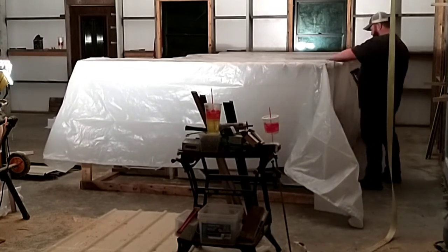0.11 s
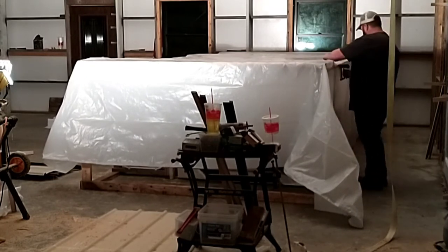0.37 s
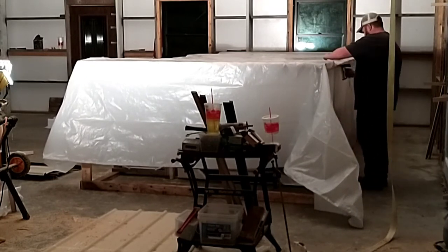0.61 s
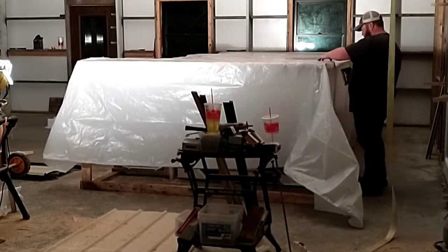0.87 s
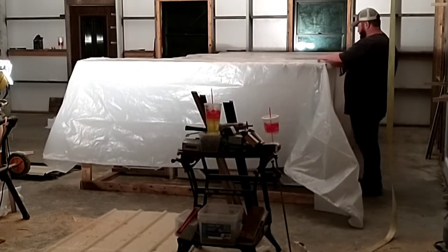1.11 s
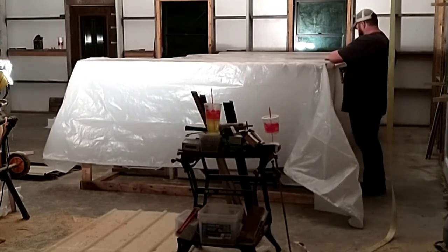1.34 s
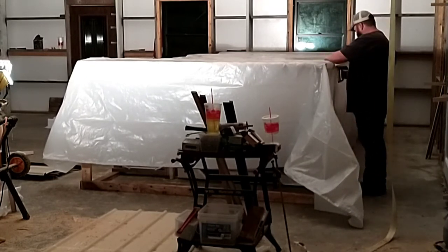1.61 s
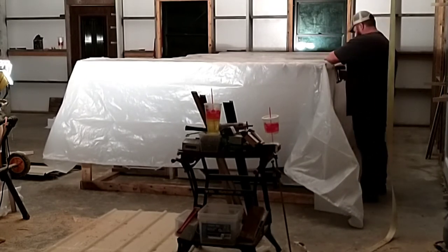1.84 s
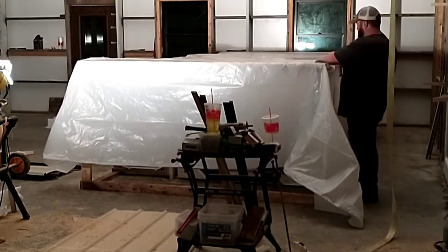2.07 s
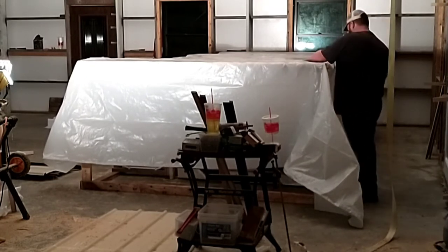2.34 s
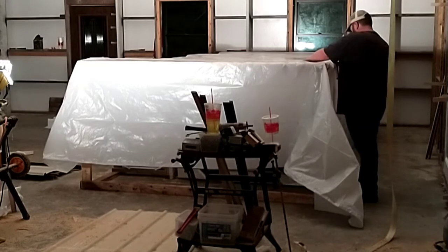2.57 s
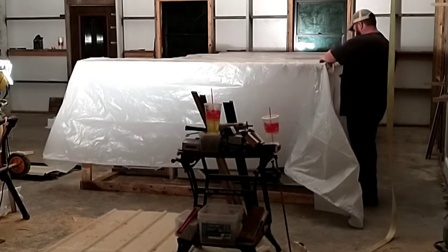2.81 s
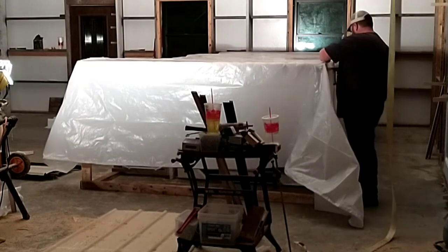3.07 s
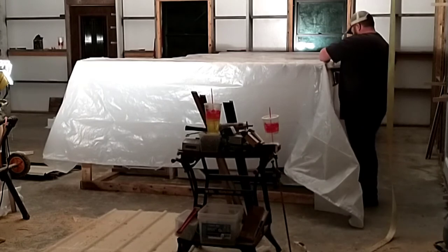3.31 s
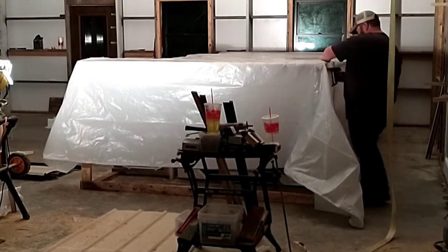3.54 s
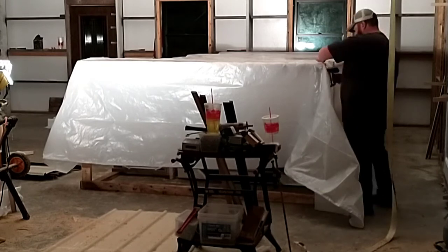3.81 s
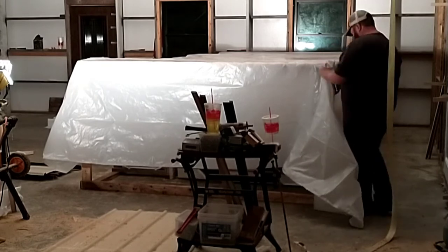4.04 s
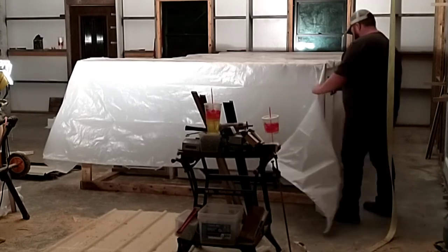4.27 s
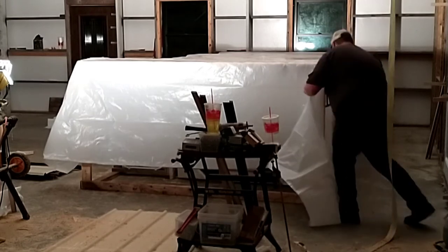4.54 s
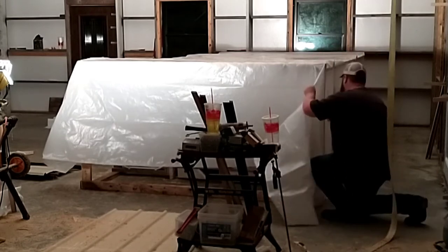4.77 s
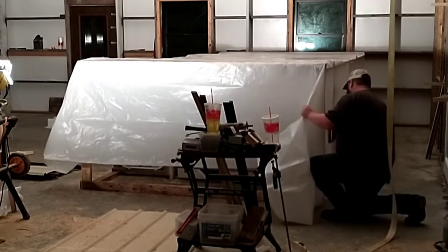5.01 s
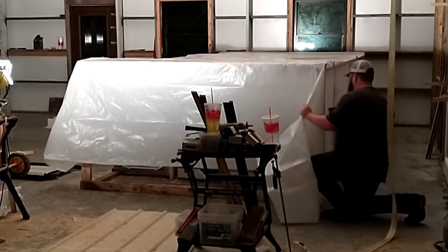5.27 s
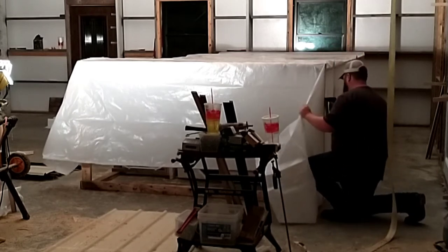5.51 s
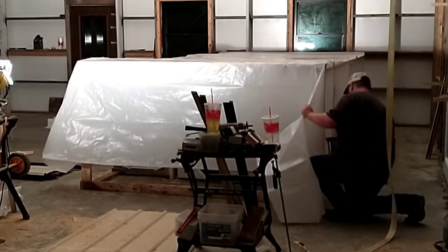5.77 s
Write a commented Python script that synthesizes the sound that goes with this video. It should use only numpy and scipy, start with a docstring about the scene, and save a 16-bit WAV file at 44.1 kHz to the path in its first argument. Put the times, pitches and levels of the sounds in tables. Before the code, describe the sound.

In a large hard-walled workshop, a hand staple gun fires fifteen sharp metallic cracks into a wooden frame, in short uneven runs, denser after the middle. Each has a brief dense echo chopped by sped-up playback. Plastic sheeting crackles between shots, loudest near the end, with dull wood bumps. Low rumble and soft hiss lie underneath. A distant stereo microphone hears it all across the room.

```python
"""Room rumble and hiss run throughout with faint hums; plastic sheeting rustles, and a hand stapler fires
in short runs at the far side of a large workshop, played faster than life.
Each shot is noise decaying band by band, ringing the gun and the wooden frame and filling the hall;
speeding up splices the echo into short slices. Rustles are crackling noise grains under drawn gestures;
hums, short tonal swells and steel snaps are sines, the room is coloured noise."""
import sys
import numpy as np
from scipy import signal
from scipy.fft import rfft, irfft
from scipy.io import wavfile
from scipy.ndimage import uniform_filter1d

SR = 44100
rng = np.random.default_rng(int(sys.argv[2]) if len(sys.argv) > 2 else 0)


def field_ratio(decibels):
    """Amplitude ratio for a level in dB (20 dB per decade); scalars and array-likes work."""
    return 10 ** (np.asarray(decibels, dtype=float) / 20)


def unload_wav(signal):
    """Save mono or channel-first audio to the path in sys.argv[1] as 16-bit WAV at rate SR, clipped to [-1, 1]."""
    wavfile.write(
        sys.argv[1],
        SR,
        np.round(np.clip(np.atleast_2d(signal).T, -1, 1) * 32767).astype(np.int16),
    )


N = 259308


def evened(x):
    """Scales to rms 1."""
    return x / np.sqrt(np.mean(x ** 2) + 1e-20)


def read(points, hz):
    """Reads a curve on a log-frequency axis."""
    f, value = np.transpose(points)
    return np.interp(np.log(hz + 1), np.log(f + 1), value)


def humps(modes, hz):
    """Power gain of resonances standing on a flat response."""
    return 1 + sum(field_ratio(db) ** 2 / (1 + (2 * (hz - f) / width) ** 2) for f, width, db in modes)


def add(mix, start_s, sound):
    """Mixes a stereo sound in at start_s."""
    part = mix[:, max(round(start_s * SR), 0):][:, :sound.shape[1]]
    part += sound[:, :part.shape[1]]


def at_ports(pair, gain, same, left):
    """Colours two unrelated signals into a left and right port of given likeness and balance."""
    size = pair.shape[1]
    hz = np.fft.rfftfreq(size, 1 / SR)
    a, b = rfft(pair, axis=1) * gain(hz)
    likeness = np.clip(read(same, hz), -1, 1)
    tilt = field_ratio(read(left, hz) / 2)
    right = likeness * a + np.sqrt(1 - likeness ** 2) * b
    return irfft(np.array([a * tilt, right / tilt]), size, axis=1)


def patches(shape, depth_db, bins, frames):
    """Random lumps over frequency and time, as a gain."""
    lumps = uniform_filter1d(rng.standard_normal(shape), bins, axis=0)
    lumps = uniform_filter1d(lumps, frames, axis=1)
    return field_ratio(depth_db * evened(lumps))


def gestures(rows, rise_db_per_s, rest_db):
    """Gain of overlapping gestures that rise, hold and fall above a resting level."""
    t = np.arange(0, N + 64, 64) / SR
    power = field_ratio(rest_db) ** 2
    for s, hold_s, db, fall_db_per_s in rows:
        rise = rise_db_per_s * np.maximum(s - t, 0)
        fall = fall_db_per_s * np.maximum(t - s - hold_s, 0)
        power = power + field_ratio(db - rise - fall) ** 2
    return np.interp(np.arange(N) / SR, t, np.sqrt(power))


# Room noise spectrum. Each row: frequency in Hz, relative density in dB per Hz.
ROOM_COLOUR = [(50, -35), (85, -6), (118, 2), (213, -17.5), (338, -17.5), (377, -19.5), (682, -26.5),
               (761, -13), (947, -32.5), (2650, -23.5), (5120, -37), (6810, -18.5), (7430, -35.5),
               (16000, -38)]
# Steady whine bands. Each row: frequency in Hz, width in Hz, level in dB.
WHINES = [(2540, 65, -86.5), (6885, 60, -89.5), (6480, 810, -82.5)]
# Room port likeness. Each row: frequency in Hz, correlation from -1 to 1.
ROOM_SAME = [(60, 1), (130, 0.98), (290, 1), (640, 0.65), (1410, -0.012), (3100, -0.8), (6820, -0.0076),
             (15000, 1)]
# Room port balance. Each row: frequency in Hz, left minus right in dB.
ROOM_LEFT = [(60, 3.5), (180, -4), (550, 5.5), (1650, 0), (4970, 7), (15000, -2)]
ROOM_DB = -69.5


def room():
    """Room noise and hiss, with whines as narrow resonant bands of noise."""
    noise = rng.standard_normal((2, N))
    air = field_ratio(ROOM_DB) * evened(at_ports(noise, lambda f: field_ratio(read(ROOM_COLOUR, f)), ROOM_SAME, ROOM_LEFT))
    for hz, width_hz, db in WHINES:
        band = lambda f: 1 / (1 + (2 * (f - hz) / width_hz) ** 2)
        air += field_ratio(db) * evened(at_ports(rng.standard_normal((2, N)), band, ROOM_SAME, ROOM_LEFT))
    return air


# Low air movement. Each row: time in seconds, level in dB.
RUMBLE = [(0, -74.5), (.6, -77.5), (.8, -68), (1.15, -70.5), (1.5, -78.5), (2.1, -80), (2.33, -69.5),
          (2.5, -74.5), (3.7, -73.5), (4.0, -64.5), (4.35, -76), (4.8, -70), (5.15, -71.5), (5.5, -66),
          (5.88, -72.5)]
PUSH_DB, PUSH_LATE_S, PUSH_S = -69.5, .065, 0.039  # every shot pushes the low air


def rumble():
    """Low noise gathered around one note, alike at both ports, swelling after every shot."""
    band = lambda f: 1 / (1 + (2 * (f - 46.0) / 56.0) ** 2) * f / (f + 38.0)
    low = evened(at_ports(rng.standard_normal((2, N)), band, [(50, 0.98)], [(50, 0.00083)]))
    t = np.arange(N) / SR
    pushes = sum(field_ratio(PUSH_DB) * np.exp(-((t - row[0] - PUSH_LATE_S) / PUSH_S) ** 2) for row in SHOTS)
    return low * (field_ratio(np.interp(t, *np.transpose(RUMBLE))) + pushes)


# Faint hum drifting down. Each row: time in seconds, frequency in Hz, level in dB before waver.
HUM_HIGH = [(0, 777, -85), (.4, 771, -79), (.9, 761, -83.5), (1.2, 765, -95), (1.38, 750, -90),
            (1.52, 754, -79.5), (2.1, 749, -81), (2.9, 748, -83.5), (3.05, 740, -95.5)]
# Short low tones. Each row: start in seconds, length in seconds, frequency in Hz, level in dB before waver.
HUM_LOW = [(2.268, .24, 416, -79.5), (2.929, .2, 407, -75), (3.978, .18, 387, -76), (5.3, .2, 370, -79.5)]


def hum(rows, waver=0.76, edge_s=0.025):
    """A near-pure tone whose strength wavers."""
    s, hz, db = np.transpose(rows)
    t = np.arange(s[0], s[-1], 1 / SR)
    drift = uniform_filter1d(rng.standard_normal((2, len(t))), 1500, axis=1)
    wobble = 1 + waver * evened(drift)
    tone = np.sqrt(2) * np.sin(2 * np.pi * np.cumsum(np.interp(t, s, hz)) / SR)
    edges = np.clip(np.minimum(t - t[0], t[-1] - t) / edge_s, 0, 1)
    return s[0], wobble * tone * field_ratio(np.interp(t, s, db)) * edges


# Sheet rustles, and the noisy late hall tail left after some shots.
# Each row: start of hold in seconds, hold in seconds, level in dB, fall in dB per second.
RUSTLES = [(.1, .01, -71, 250), (.16, .075, -67.5, 240), (.85, .01, -79, 88), (1.1, .015, -73, 180),
           (1.225, .02, -79, 112), (1.32, .025, -66, 260), (2.05, .01, -60.5, 160), (2.15, .01, -64, 242),
           (2.21, .15, -73.5, 154), (2.82, .01, -62.5, 127), (2.915, .01, -58.5, 200),
           (3.025, .01, -73, 304.5), (3.745, .03, -59.5, 283), (4.03, .01, -68.5, 330),
           (4.13, .02, -55.5, 92.5), (4.19, .01, -58, 200), (4.24, .03, -55, 347), (4.31, .09, -69, 61.5),
           (4.55, 0.012, -56.5, 218.5), (4.63, .01, -60, 290), (4.9, .01, -56.5, 338),
           (5.07, .01, -49.5, 329), (5.178, .01, -61.5, 404.5), (5.36, .005, -72.5, 380),
           (5.518, .01, -62.5, 601), (5.8, .03, -66, 450)]
# Sheet spectrum. Each row: frequency in Hz, relative density in dB per Hz.
SHEET = [(590, -37.5), (1000, -2), (1100, -4), (1690, -7), (2130, -4), (2560, -6), (3230, -5.5),
         (3580, -4.5), (6110, -11), (7440, -6.5), (9300, -14), (10900, -22), (16000, -26)]
# Frame bumped or jolted by a shot. Each row: peak time in seconds, level in dB, fall in dB per second.
THUMPS = [(.43, -52, 200), (.69, -52, 200), (1.72, -51.5, 202), (2.05, -62, 250), (2.83, -62.5, 122),
          (3.73, -64, 146), (4.2, -66.5, 72), (4.39, -64, 300), (4.578, -48.5, 203), (4.902, -47, 200.5),
          (5.06, -49, 241), (5.516, -54.5, 222), (5.849, -67, 200)]
# Thump spectrum before the timber modes. Each row: frequency in Hz, relative density in dB per Hz.
THUMP_COLOUR = [(120, -42), (200, -15), (263, -10.5), (504, -7.5), (658, -5.5), (852, -9.5), (1300, -22.5),
                (1690, -49.5), (2860, -120)]
# Timber modes. Each row: frequency in Hz, width in Hz, height in dB re the flat response.
FRAME = [(364, 11, -2), (608, 20, -7), (849, 23, -2), (1120, 35, -4)]
# Port likeness. Each row: frequency in Hz, correlation.
SAME = [(60, 1), (120, 0.94), (240, 0.89), (480, 0.65), (950, 0.09), (1890, 0.05), (3770, 0.033),
        (7520, 0.25), (15000, 0.4)]
# Port balance. Each row: frequency in Hz, left minus right in dB.
LEFT = [(60, 1.5), (100, -1), (180, 1), (310, -0.5), (550, -0.5), (950, 1.5), (1650, 0), (2860, 2.0),
        (4970, 2.0), (8640, 7.5), (15000, 0.5)]
GRAINS_PER_S = 900
RUSTLE_RISE_DB_PER_S, RUSTLE_REST_DB = 1300, -81
THUMP_RISE_DB_PER_S, THUMP_REST_DB = 1500, -81


def rustle():
    """Crackling grains of the sheet over a patchy swish; the frame thumps when it is pushed."""
    crackle = field_ratio(3.8 * np.minimum(rng.exponential(1, N), 4)) * (rng.random(N) < GRAINS_PER_S / SR)
    grains = rng.standard_normal((2, N)) * (1 + .5 * crackle)
    z = signal.stft(grains, nperseg=256, noverlap=192)[2]
    z = z * patches(z.shape[1:], 1.5, bins=4, frames=14)
    z = z * patches(z.shape[1:], 1.5, bins=60, frames=4)
    grains = signal.istft(z, nperseg=256, noverlap=192)[1][:, :N]
    sheet = evened(at_ports(grains, lambda f: field_ratio(read(SHEET, f)), SAME, LEFT))
    timber = lambda f: field_ratio(read(THUMP_COLOUR, f)) * np.sqrt(humps(FRAME, f))
    thump = evened(at_ports(rng.standard_normal((2, N)), timber, SAME, LEFT))
    bumps = [(s, 0, db, fall) for s, db, fall in THUMPS]
    return (sheet * gestures(RUSTLES, RUSTLE_RISE_DB_PER_S, RUSTLE_REST_DB)
            + thump * gestures(bumps, THUMP_RISE_DB_PER_S, THUMP_REST_DB))


# Shot spectrum before modes and tone. Each row: frequency in Hz, relative density in dB per Hz.
SHOT_COLOUR = [(47, -45), (80, -11), (203, -17.5), (338, -2.5), (672, -5), (917, 0), (1050, -7.5),
               (1200, -4.5), (1310, -11.5), (1990, -6.5), (2220, -3), (5520, -12), (8050, -9), (9190, -18),
               (16000, -28)]
# Steel parts, before detuning. Each row: frequency in Hz, width in Hz, height in dB re the flat response.
GUN = [(1780, 21, 4), (2230, 21, -2.5), (2450, 38, -3.5), (3390, 65, 4), (3660, 54, 3), (4900, 67, -0.5),
       (5100, 40, -4), (6200, 83, -2.5), (7080, 130, -2), (8030, 67, -7)]
LOW_MID_DB, HIGH_MID_DB, MID_PER_FRAME = -4, 1.88, 0.59  # the mids rise with the frame's share


def coloured(echo, frame_db, top_db, ripple_db=3.0):
    """Gives reflections the ring of gun and frame; every blow detunes the gun and stirs other hall modes."""
    detune = 1 + 0.031 * rng.standard_normal(len(GUN))
    modes = [(f * d, width, db) for (f, width, db), d in zip(GUN, detune)] + FRAME
    mid_db = MID_PER_FRAME * frame_db
    tone = [(900, frame_db), (1500, mid_db + LOW_MID_DB), (3600, mid_db + HIGH_MID_DB),
            (4600, 0.0011), (9000, 0.0011), (11000, top_db)]  # (Hz, dB)
    ripple = ripple_db * rng.standard_normal(400)  # one value every 55 Hz

    def gain(f):
        gain_db = read(SHOT_COLOUR, f) + read(tone, f) + np.interp(f / 55, np.arange(400), ripple)
        return field_ratio(gain_db) * np.sqrt(humps(modes, f))

    return at_ports(echo, gain, SAME, LEFT)


# Fainter slices of a shot ahead of it. Each row: start in seconds, level in dB, fade-in in ms.
LEADS = [(0.389, -46, 22), (.642, -44, 22.4), (1.668, -60.5, 6), (2.636, -48.5, 42), (3.147, -50, 8.7),
         (4.936, -41, 12), (5.16, -54.5, 13)]


def lead(s, db, fade_ms, hold_ms=11.0):
    """Shot-coloured noise fades in, holds for a fixed short time, then dies."""
    ms = np.arange(round(.06 * SR)) / SR * 1000
    fade_in = np.sin(np.pi / 2 * np.clip(ms / fade_ms, 0, 1)) ** 2
    die = np.exp(-np.maximum(ms - fade_ms - hold_ms, 0) / 11.0)
    noise = rng.standard_normal((2, len(ms)))
    return s, field_ratio(db) * fade_in * die * evened(coloured(noise, frame_db=-11.5, top_db=-2.0))


# Stapler shots. Each row: start in seconds, relative level in dB, frame re gun in dB, top re gun in dB,
# rise in ms, pace of decay as a factor.
SHOTS = [(.407, -8, -8.5, -3, 19, 1.1), (.663, -7, -8, -6, 17.5, 1.074), (1.679, -5, -12, -2.5, 2.8, 1.027),
         (1.899, -6.5, -8, -3, 19.6, 1), (2.504, -9, -7, -2.5, 4.1, 0.86),
         (2.667, -2.5, -9.5, -8, 20.6, 1.004), (3.159, -7.5, -8.5, -4, 12, 1.034),
         (3.348, -5, -8, -5, 24, 1.06), (3.534, -6.5, -2, -2, 3.3, 0.98),
         (3.874, -5.5, -5.5, -1.5, 3.8, 0.93), (4.417, -4, -6, -2.5, 17.3, 0.97),
         (4.723, -4.5, -5, -1.7, 8.7, .99), (4.948, -5, -5.5, -5, 19.3, 1.026),
         (5.199, 1, -19.5, -3, 3.6, 1.17), (5.567, -8, -4.5, -2, 20, 1.008)]
# Hall decay at pace 1. Each row: age in seconds, level in dB.
ECHO = [(0, -4), (.03, -10.5), (.06, -16.5), (.09, -29), (.12, -41.5), (.16, -52), (.25, -63.5)]
# Decay speed by band. Each row: frequency in Hz, speed as a factor.
PACE = [(150, 0.69), (500, 0.67), (1500, 0.78), (5000, 1.016), (9000, 1), (15000, 1.19)]
# Build-up by band, bass late. Each row: frequency in Hz, time constant in ms.
BUILD = [(150, 44), (600, 28), (1500, 5.1), (4000, 2.4)]
SLICE_S, SLICE_PHASE_TURNS, SLICE_DEPTH = .024, 0.25, .8


def shot(row, length_s=.45):
    """Dense reflections die band by band, in steps where the slices join."""
    s, level_db, frame_db, top_db, rise_ms, pace = row
    size = round(length_s * SR)
    taps = rng.standard_normal((2, size)) * field_ratio(1.92 * rng.standard_normal((2, size)))
    hz, t, z = signal.stft(taps, SR, nperseg=128, noverlap=96)
    build = 1 - np.exp(-t * 1000 / read(BUILD, hz)[:, None])
    t = np.maximum(t - rise_ms / 1500, 0)  # decay starts two thirds into the rise
    # the first crack is brighter than its echo
    build *= 1 + 0.36 * (hz[:, None] / 12000) ** 3 * np.exp(-t / 0.015)
    # inside a slice the echo dies slowly, at each join it jumps ahead
    turn = 2 * np.pi * (t / SLICE_S + SLICE_PHASE_TURNS)
    swing = np.sin(turn) - np.sin(2 * np.pi * SLICE_PHASE_TURNS)
    age = t - SLICE_DEPTH * SLICE_S / (2 * np.pi) * swing
    decay_db = np.interp(pace * age * read(PACE, hz)[:, None], *np.transpose(ECHO))
    z *= field_ratio(decay_db) * build * patches(decay_db.shape, 1.92, bins=3, frames=14)
    echo = signal.istft(z, SR, nperseg=128, noverlap=96)[1][:, :size]
    ms = np.arange(size) / SR * 1000
    attack = np.sin(np.pi / 2 * np.clip(ms / max(rise_ms, .3), 0, 1)) ** 2
    fade = np.cos(np.pi / 2 * np.minimum(1.25 * ms / ms[-1], 1) ** 2) ** 2
    return s, field_ratio(level_db) * attack * fade * coloured(echo, frame_db, top_db)


# Brief tonal swells, mostly around the shots.
# Each row: centre in seconds, peak in dB before port balance, frequency in Hz, width in ms.
SWELLS = [(.47, -39.5, 392, 11), (.726, -40, 386, 11), (1.948, -42.5, 358, 16.4), (2.583, -41.5, 375.6, 25),
          (2.732, -32, 588, 13), (3.199, -34.5, 1190, 9.6), (3.372, -37.5, 452, 13.5),
          (3.566, -29, 397, 12), (3.891, -40.5, 1184, 23.5), (4.388, -58.5, 475, 13),
          (4.437, -38.5, 615, 20.5), (4.46, -34, 910, 10), (4.521, -37.5, 849, 24),
          (4.593, -47.5, 365, 19.5), (4.808, -44, 907, 9), (4.907, -42, 647, 16), (4.992, -31.5, 640, 11.8),
          (5.02, -40, 900, 20), (5.248, -42, 637, 22), (5.63, -39.5, 913, 18.5)]
# Snaps and ticks of steel. Each row: centre in seconds, peak in dB before port balance, frequency in Hz.
SNAPS = [(4.096, -57, 3360), (4.437, -14.5, 8100), (4.73, -17, 7790), (4.736, -22.5, 3390),
         (5.204, -11.5, 5100)]
SNAP_MS = 2.4
THUD_HZ, THUD_DB, THUD_MS, THUD_LATE_S = 139.2, -55, 18.0, .025  # every shot thuds through the floor


def swell(s, db, hz, width_ms):
    """A short swell of one sine, its phase differing between ports as far as they are unlike."""
    size = round(2 * width_ms / 1000 * SR)
    start, apart = rng.random(2)
    sides = np.array([[.5], [-.5]])
    shift = np.arccos(np.clip(read(SAME, hz), -1, 1)) * (2 * apart - 1) * sides
    tilt = field_ratio(read(LEFT, hz) * sides)
    tone = np.sin(2 * np.pi * (hz * np.arange(size) / SR + start) + shift)
    return s - size / 2 / SR, field_ratio(db) * tilt * tone * np.hanning(size)


def scene():
    """Room, rustle, hums and shots."""
    mix = room() + rumble() + rustle()
    add(mix, *hum(HUM_HIGH))
    for s, length_s, hz, db in HUM_LOW:
        add(mix, *hum([(s, hz, db), (s + length_s, hz, db)]))
    for row in LEADS:
        add(mix, *lead(*row))
    for row in SHOTS:
        add(mix, *shot(row))
        add(mix, *swell(row[0] + THUD_LATE_S, THUD_DB, THUD_HZ, THUD_MS))
    for row in SWELLS:
        add(mix, *swell(*row))
    for row in SNAPS:
        add(mix, *swell(*row, SNAP_MS))
    return mix


def top_cut(x):
    """Nothing passes above the cut-off."""
    return signal.sosfilt(signal.butter(12, 16970, fs=SR, output="sos"), x)


# Microphone port resonances. Each row: frequency in Hz, width in Hz, height in dB re the flat response.
PORT = [(7280, 380, -3), (10000, 420, -5.5)]
EDGE_HZ = 15950


def record(dry):
    """Port resonances lift two treble bands; a steep band limit cuts the top."""
    hz = np.fft.rfftfreq(N, 1 / SR)
    power_gain = humps(PORT, hz) / (1 + (hz / EDGE_HZ) ** 200)
    heard = irfft(rfft(dry, axis=1) * np.sqrt(power_gain), N, axis=1)
    return top_cut(heard)


dry = scene()
out = record(dry)
unload_wav(out)
```